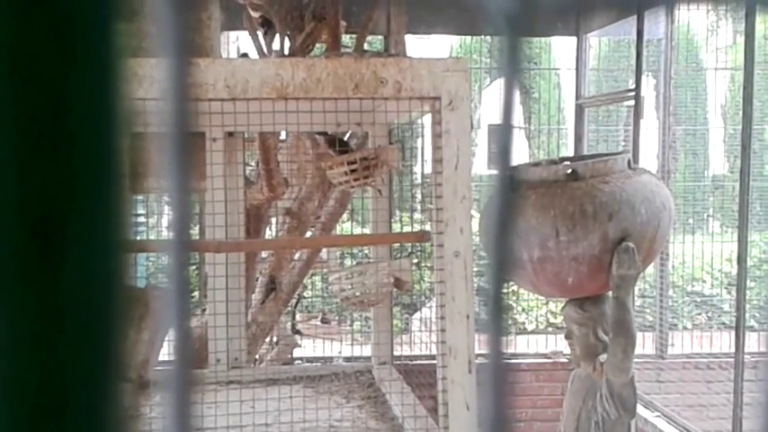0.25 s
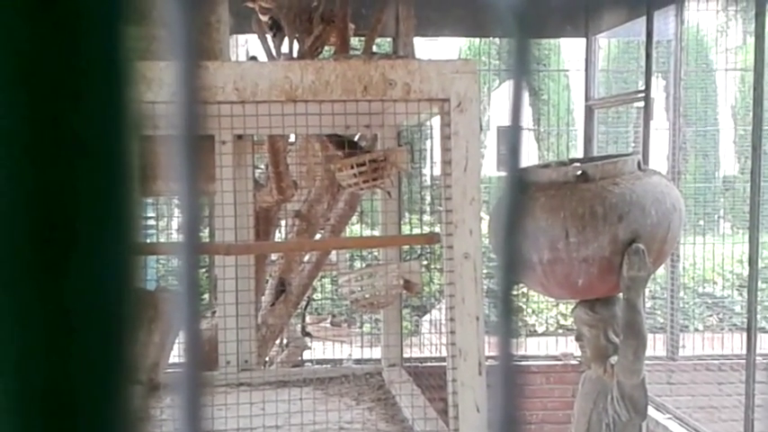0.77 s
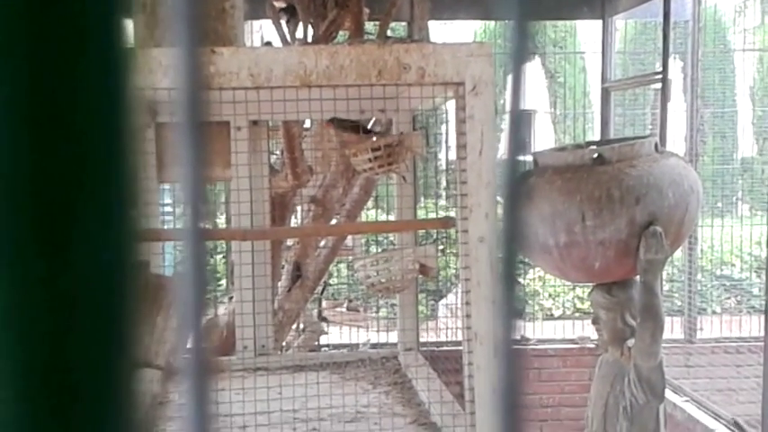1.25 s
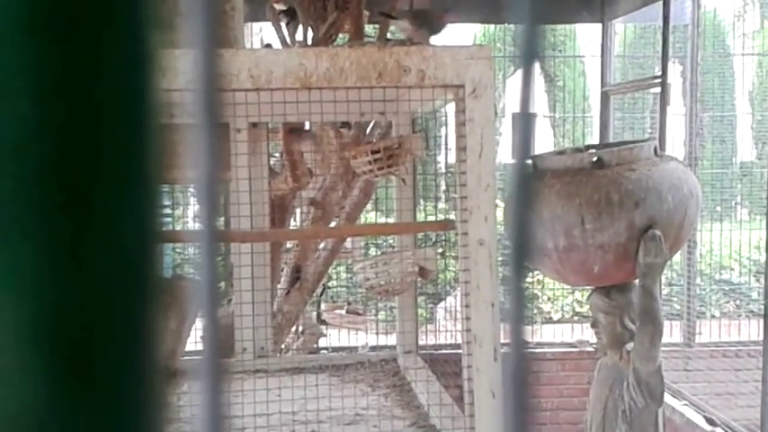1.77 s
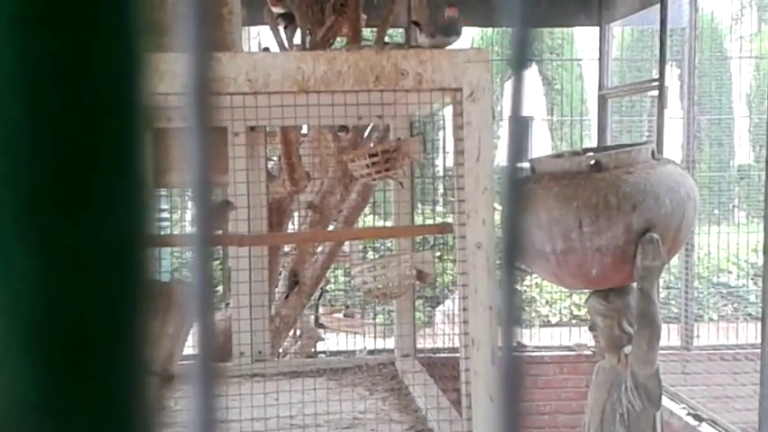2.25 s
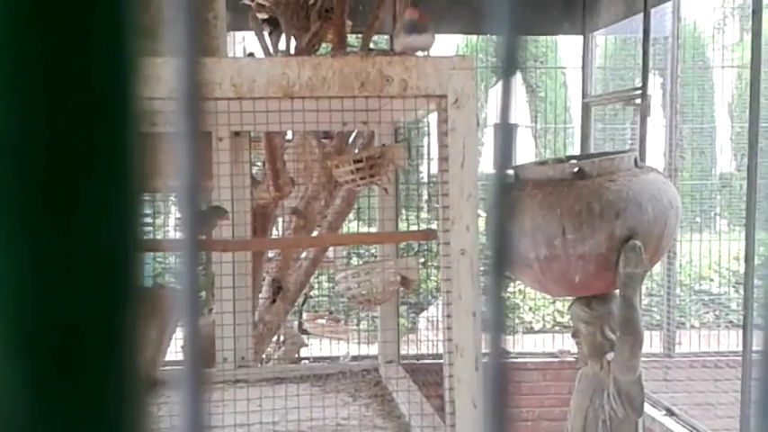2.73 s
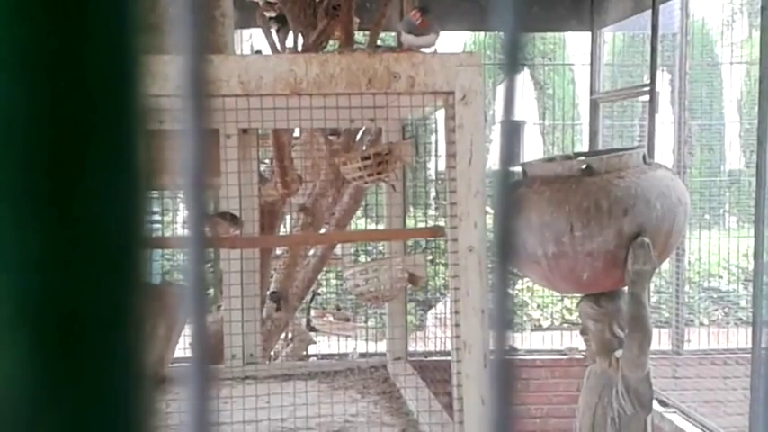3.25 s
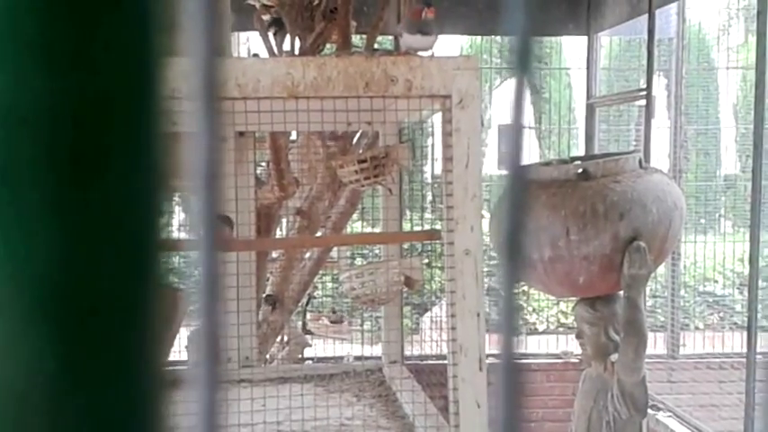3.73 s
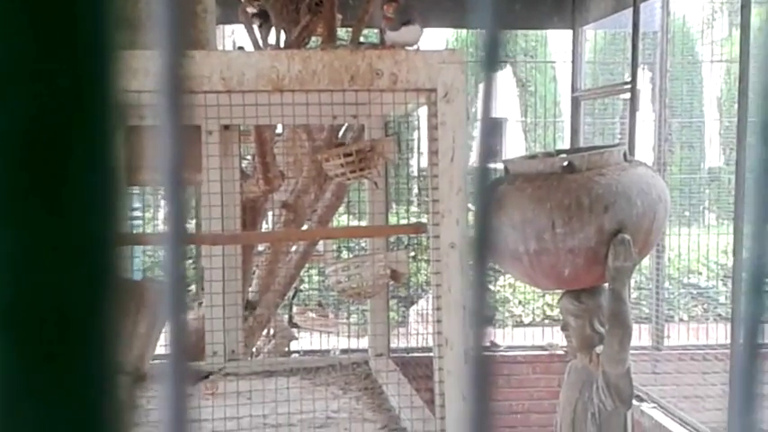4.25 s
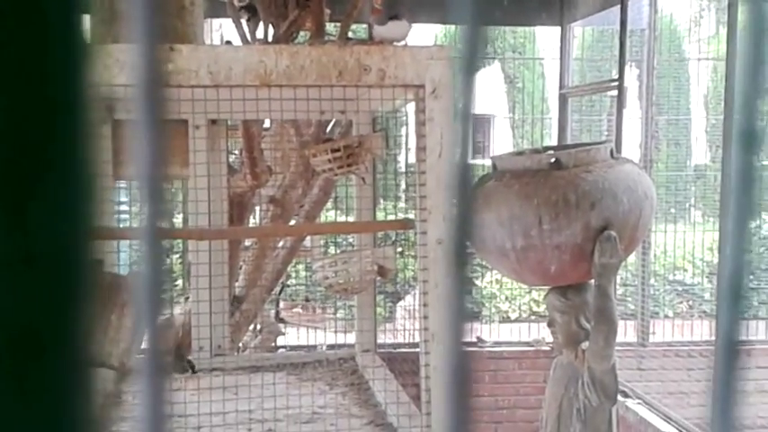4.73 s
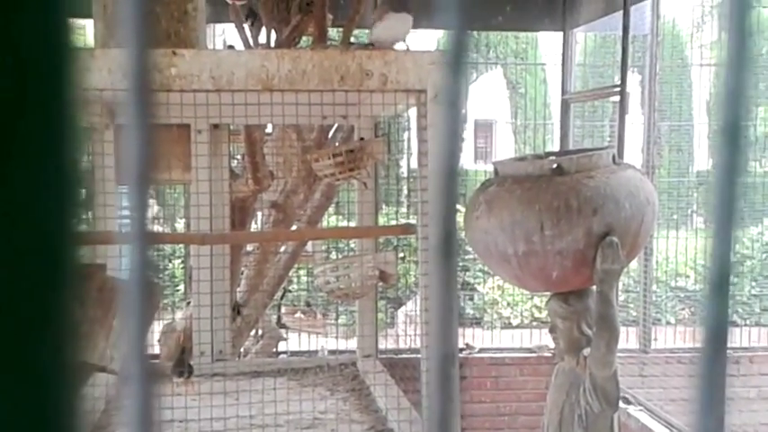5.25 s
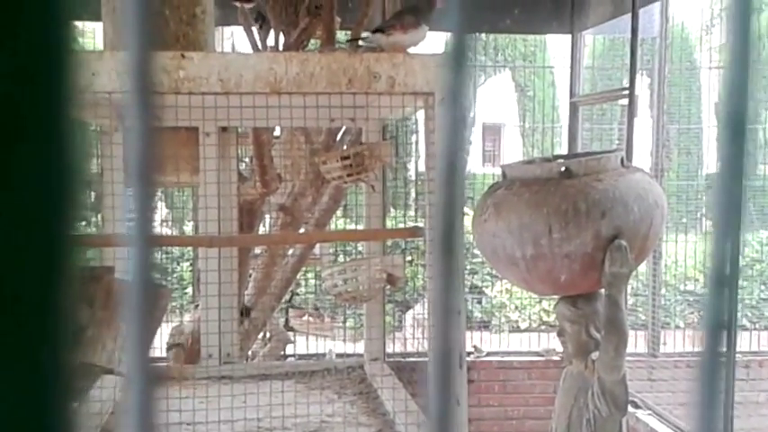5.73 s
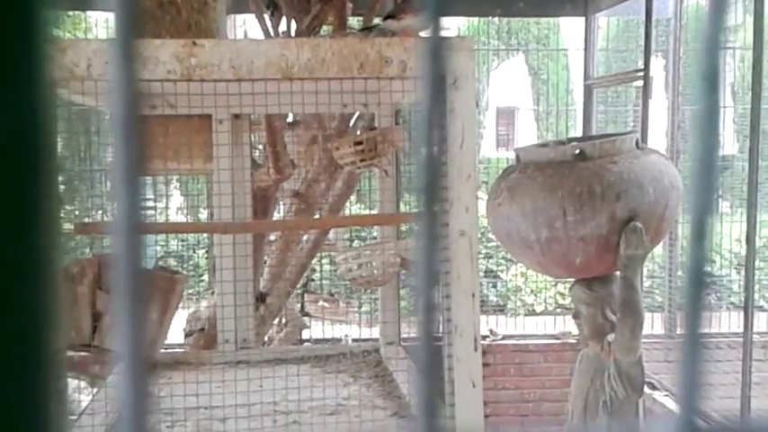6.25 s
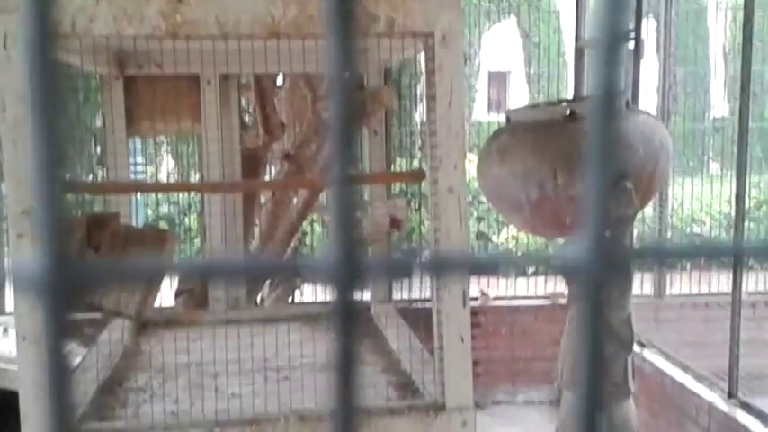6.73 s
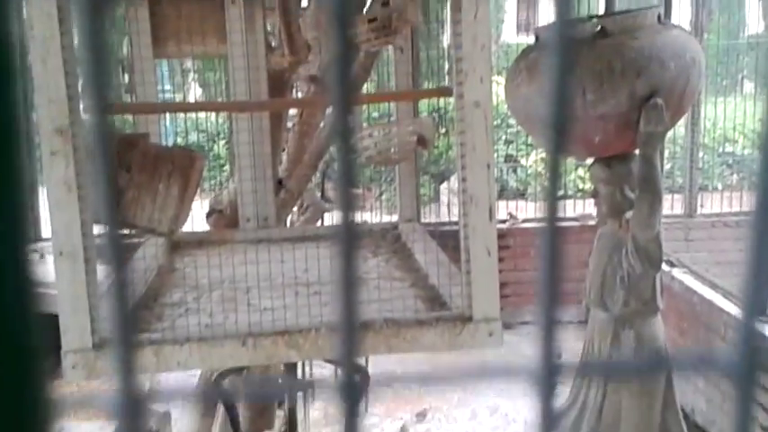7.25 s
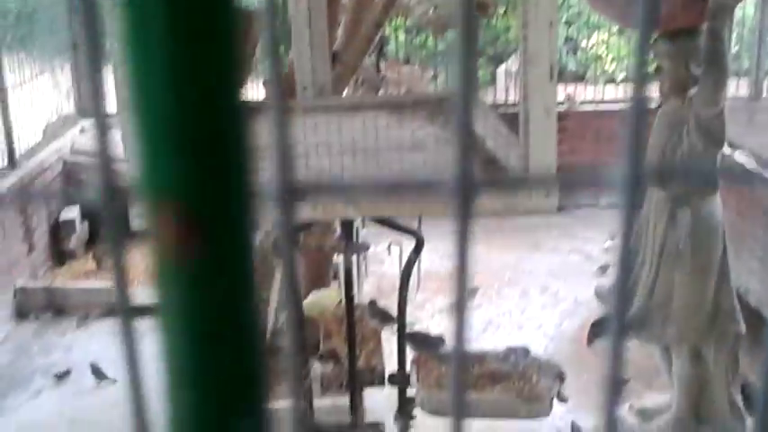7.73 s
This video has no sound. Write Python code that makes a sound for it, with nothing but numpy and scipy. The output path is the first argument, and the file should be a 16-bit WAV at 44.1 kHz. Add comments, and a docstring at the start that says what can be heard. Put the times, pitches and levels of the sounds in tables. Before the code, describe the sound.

Small finches call inside a roofed outdoor aviary. Short nasal beeps and thin peeps come first, then a loud burst of piercing high whistles around one second. Quieter peeps and soft low notes follow, then bright upward chips recur more regularly later on. A farther flock twitters constantly with short hard echoes. A handheld phone microphone also catches soft garden air, a faint low engine drone and two tiny wire ticks.

```python
"""Small finches near a phone whistle, peep, chip and rasp (gliding, hoarse near-sines) or give nasal calls
(overtone stacks under a beak resonance) in a roofed outdoor aviary. The far flock, many short calls at random
moments, blurs into chatter in the echoes (sparse decaying taps). Ticks on the wire are sharp impulses with fizz;
the garden's low wash is shaped noise, a far engine's drone two narrow noise bands."""
import sys
import numpy as np
from scipy import signal
from scipy.fft import rfft, irfft, next_fast_len
from scipy.io import wavfile
from scipy.ndimage import uniform_filter1d

SR = 44100
rng = np.random.default_rng(int(sys.argv[2]) if len(sys.argv) > 2 else 0)


def generate_wav(signal):
    """Clip the signal to [-1, 1] and save it as 16-bit WAV at the path in sys.argv[1]."""
    frames = np.transpose(np.atleast_2d(signal))
    scaled = np.clip(frames, -1, 1) * 32767
    pcm = np.round(scaled).astype(np.int16)
    wavfile.write(sys.argv[1], SR, pcm)


N = 352403


def gain_of(db):
    """Decibels to amplitude."""
    return 10 ** (np.asarray(db) / 20)


def evened(x):
    """Scaled to rms 1."""
    return x / np.sqrt(np.mean(abs(x) ** 2) + 1e-20)


def read(points, hz):
    """Curve interpolated on a log-frequency axis."""
    point_hz, value = np.transpose(points)
    return np.interp(np.log(hz + 1), np.log(point_hz + 1), value)


def add(mix, start_s, sound):
    """Mixes a sound in at start_s, cut at the end of the mix."""
    part = mix[round(start_s * SR):][:len(sound)]
    part += sound[:len(part)]


def garden():
    """Garden air and distant traffic: random short-time spectra with faint drifting patches, steadier bass."""
    # Wash spectrum. Each row: frequency in Hz, relative density in dB.
    wash_spectrum = [(15, -46), (30, -28), (45, -27), (65, 6), (90, -5), (140, -10), (230, -12),
                     (350, -9.5), (560, -14.5), (1100, -12), (2600, -8.5), (5000, -4), (8000, -11),
                     (10000, -11), (14900, -8.5)]
    level_db, patch_db = -32.5, 2.25
    frames, hz = N // 256 + 5, np.fft.rfftfreq(1024, 1 / SR)
    a, b, patches = rng.standard_normal((frames, 513, 3)).T
    patches = uniform_filter1d(patches, 8, 0)  # over frequency
    patches = evened(uniform_filter1d(patches, 20, 1))  # over time
    depth_db = patch_db * np.minimum(hz / 600, 1)
    spectra_db = read(wash_spectrum, hz)[:, None] + depth_db[:, None] * patches
    spectra = (a + 1j * b) * gain_of(spectra_db)
    wash = signal.istft(spectra, nperseg=1024, noverlap=768)[1][:N]
    return gain_of(level_db) * evened(wash)


def drone():
    """Far engine on two low notes: two narrow bands of noise, each swelling on its own."""
    # Swells. Each row: time in seconds, upper note level in dB, lower note level in dB.
    swells = [(0, -70, -65), (1.1, -55.5, -69), (2.1, -63.5, -70), (3, -63, -68), (3.52, -62, -53.5),
              (4.05, -63, -64), (5.55, -51.5, -61), (5.92, -71, -53), (6.25, -57, -48.5), (6.68, -57, -65),
              (7.41, -64, -54), (7.99, -60, -59)]
    # Band centres: upper note in Hz, lower note in Hz.
    centres_hz = (147, 104.6)
    half_width_hz = 7.5  # to half amplitude
    point_s, *levels_db = np.transpose(swells)
    out, hz = np.zeros(N), np.fft.rfftfreq(N, 1 / SR)
    for centre_hz, level_db in zip(centres_hz, levels_db):
        a, b = rng.standard_normal((2, len(hz)))
        band = irfft((a + 1j * b) / (1 + ((hz - centre_hz) / half_width_hz) ** 2), N)
        out += evened(band) * gain_of(np.interp(np.arange(N) / SR, point_s, level_db))
    return out


def aviary(x):
    """Echoes off roof, wall and floor: sparse taps of random sign, each band dying at its own speed."""
    # Decay. Each row: frequency in Hz, time to fall 60 dB in seconds.
    decay = [(1500, 0.38), (4000, 0.25), (7000, 0.28)]
    taps = np.zeros(SR // 2)
    at = np.arange(160, len(taps) - 20, 20)
    taps[at + rng.integers(0, 20, len(at))] = rng.choice([-1., 1.], len(at))
    hz, t, spectra = signal.stft(taps, SR, nperseg=256)
    fading = spectra * gain_of(-60 * t / read(decay, hz)[:, None])
    tail = signal.istft(fading, SR, nperseg=256)[1]
    return signal.fftconvolve(x, tail / np.linalg.norm(tail))[:N]


def breath(length_s, rise_s):
    """Time as a share of the call, and its envelope: quick onset, sagging body, rounded end."""
    t = np.arange(1, (length_s + .004) * SR) / SR
    u = t / t[-1]
    rise = np.minimum(t / rise_s, 1)
    return u, evened(rise * np.exp(-.3 * u) * np.cos(np.pi * u / 2) ** 0.11)


def note(length_s, start_hz, end_hz, level_db, hoarse_hz, octave_db=-42.0):
    """A gliding near-sine with a breathy octave; an unsteady syrinx smears the line into a band."""
    u, shape = breath(length_s, rise_s=.004 + .1 * length_s)
    turns = np.cumsum(start_hz + (end_hz - start_hz) * u ** 1.403) / SR  # the glide speeds up
    a, b, c = rng.standard_normal((3, round(.3 * SR)))
    smooth = signal.butter(2, np.clip(hoarse_hz, 60, 2000), fs=SR, output="sos")
    flutter = evened(signal.sosfilt(smooth, a + 1j * b)[-len(u):])
    flutter_share = np.clip(0.12 + hoarse_hz / 400, 0, 1)  # of the power
    unsteady = np.sqrt(1 - flutter_share) + np.sqrt(flutter_share) * flutter
    tone = unsteady * np.exp(2j * np.pi * turns)
    octave_breath = evened(uniform_filter1d(c, 60))[:len(u)]
    octave = octave_breath * shape * np.exp(4j * np.pi * turns)
    return gain_of(level_db) * shape * np.sqrt(2) * (tone + gain_of(octave_db) * octave).real


def nasal(length_s, start_hz, end_hz, level_db, beak_hz, open_share=0.073):
    """Overtones of a slightly arched, slightly shaky pitch, strongest at the beak resonance."""
    u, shape = breath(length_s, rise_s=0.0083)
    shake = evened(uniform_filter1d(rng.standard_normal(round(.4 * SR)), 300))[:len(u)]
    hz = (start_hz + (end_hz - start_hz) * u) * (1 + .016 * np.sin(np.pi * u) + .004 * shake)
    k = np.arange(1, int(7500 / max(start_hz, end_hz)) + 1)[:, None]
    leak = np.clip(open_share, 0, 1) * (k * hz > 1150)  # overtones off the resonance
    resonance = 1 / (1 + ((k * hz - beak_hz) / 950) ** 2) ** 2
    overtones = (leak + resonance) * np.sin(2 * np.pi * k * np.cumsum(hz) / SR)
    shape = shape * gain_of(2.5 * shake[::-1])  # the breath is uneven
    return gain_of(level_db) * shape * evened(overtones.sum(0))


def far_flock(voices=110, count=1600):
    """Short calls, five in six hoarse chips and the rest nasal, repeated at random moments."""
    # Call weighting. Each row: frequency in Hz, relative level in dB.
    weighting = [(1100, -15.5), (2000, -20), (3000, -17), (3800, 1.5), (5000, -6), (5900, 0.5), (6600, -10),
                 (7400, -8.5)]
    out, calls = np.zeros(N), []
    for k in range(voices):
        long, glide = rng.random(2)
        hz = 1200 + 6200 * (k + long) / voices
        db = read(weighting, hz)
        if k % 6:
            calls.append(note(.01 + .04 * long, hz, hz * (.9 + .25 * glide), db, 150 + 300 * long))
        else:
            pitch_hz = 900 + 550 * glide
            calls.append(nasal(0.0293 + 0.037 * long, pitch_hz, pitch_hz * 1.04, db - 3, beak_hz=hz))
    for when, which, loud in rng.random((count, 3)):
        add(out, when * N / SR, gain_of(8.7 * loud) * calls[int(which * len(calls))])
    return evened(out)


def chatter():
    """The far flock, mostly echo, rising and falling as it gets busier or quieter."""
    # Busyness. Each row: time in seconds, level in dB.
    busyness = [(0, -25), (.27, -36.5), (.51, -35), (.93, -30.5), (1.05, -39), (1.29, -30), (1.55, -36),
                (2.199, -39), (2.45, -29), (3.05, -37.5), (3.61, -33.5), (4.25, -30.5), (4.54, -29.5),
                (4.68, -31), (4.82, -26.5), (5.05, -35.5), (5.72, -27.5), (6.25, -35), (6.7, -28.5),
                (7.08, -35.5), (7.41, -27.5), (7.56, -33.5), (7.99, -36.5)]
    flock = far_flock()
    far = evened(gain_of(-4.0) * flock + aviary(flock))
    return far * gain_of(np.interp(np.arange(N) / SR, *np.transpose(busyness)))


def ticks():
    """Dry, bright clicks on the wire: an impulse and a short fizz, the bass differenced away."""
    # Each row: start in seconds, strength in dB.
    clicks = [(1.1832, 2.5), (4.7422, 2)]
    out, t = np.zeros(N), np.arange(200) / SR
    for start_s, db in clicks:
        fizz = 0.5 * rng.standard_normal(len(t)) * gain_of(-60 * t / 0.0065)
        add(out, start_s, gain_of(db) * np.convolve((t == 0) + fizz, [1, -1.7, .7]))
    return out


def low_notes(out):
    """Soft low notes that sag slightly in pitch; louder ones are hoarser."""
    # Each row: start in seconds, length in seconds, start pitch in Hz, level in dB.
    rows = [(.405, .1, 1650, -43), (.819, 0.11, 2776, -45), (1.576, 0.018, 2340, -37),
            (1.876, 0.074, 2110, -41.5), (1.97, 0.096, 2152, -40.5), (2.108, .05, 2340, -41),
            (2.223, .055, 1980, -38), (2.28, 0.046, 2310, -33), (2.46, 0.043, 2150, -37),
            (2.553, 0.056, 2180, -35.5), (2.642, 0.078, 2373, -36), (2.721, .11, 2220, -39.5),
            (3.55, 0.025, 1707, -44.5), (4.06, .039, 2900, -45), (4.65, .1, 2710, -39.5),
            (4.755, 0.055, 2800, -39), (5.683, 0.021, 1634, -42.5), (6.283, .27, 2427, -46.5),
            (7.07, 0.074, 1312, -46), (7.239, .027, 2256, -38), (7.424, 0.012, 3180, -36.2),
            (7.489, 0.038, 1323, -44), (7.639, 0.05, 1338, -44.5)]
    sag_share, soft_db, soft_hoarse_hz, hoarse_hz_per_db = .01, -47, 60, 18
    for start_s, length_s, hz, db in rows:
        hoarse_hz = soft_hoarse_hz + hoarse_hz_per_db * (db - soft_db)
        add(out, start_s, note(length_s, hz, hz * (1 - sag_share), db, hoarse_hz))


def nasal_calls(out):
    """Stacks of overtones; higher calls leak more of them off the beak resonance."""
    # Each row: start in seconds, length in seconds, start and end pitch in Hz, level in dB,
    # beak resonance in Hz.
    rows = [(.02, .08, 1408, 1464, -34.9, 4000), (.39, .075, 1330, 1450, -35.5, 3900),
            (.61, .07, 950, 945, -29.5, 4150), (.75, .07, 1360, 1380, -35.7, 3800),
            (2.05, .12, 640, 640, -37.8, 5300), (2.21, .09, 988, 1016, -34.7, 4010),
            (2.31, .07, 968, 952, -32.3, 4450), (2.48, .08, 930, 932, -32, 4500),
            (2.71, .07, 930, 940, -31.7, 4450), (3.37, .06, 952, 1020, -30.5, 4350),
            (3.76, .08, 1332, 1372, -32, 4060), (4.715, .08, 1385, 1400, -30.5, 3700),
            (5.33, .12, 1346, 1432, -35.5, 4170), (5.74, .07, 1368, 1480, -29.6, 5200),
            (6.05, .07, 1248, 1264, -34.3, 3770), (6.585, .065, 1344, 1442, -31.3, 3900),
            (7.68, .06, 924, 924, -34.4, 3700), (7.83, .06, 1160, 1160, -38.8, 3480)]
    open_at_1khz, open_power = 0.036, 3.9
    for start_s, length_s, start_hz, end_hz, db, beak_hz in rows:
        open_share = open_at_1khz * (start_hz * .001) ** open_power
        add(out, start_s, nasal(length_s, start_hz, end_hz, db, beak_hz, open_share))


def rasps_and_hoarse_chips(out):
    """Broad rasps and two short hoarse upward chips, smeared by a fast flutter."""
    # Each row: start in seconds, length in seconds, start and end pitch in Hz, level in dB.
    rows = [(.85, .11, 5900, 5700, -25), (.201, 0.064, 6000, 6400, -25.5), (.17, .1, 3400, 3390, -34),
            (2.371, .07, 5400, 5200, -29.5), (2.502, 0.095, 5500, 5800, -28.5),
            (3.526, 0.071, 5600, 5600, -26.5), (1.206, .084, 3230, 3200, -32),
            (4.031, .11, 4600, 4100, -31.5), (4.194, 0.092, 4500, 4100, -29),
            (4.509, 0.07, 5300, 4900, -28), (6.65, .13, 4340, 3860, -29.5), (4.166, .02, 5620, 6700, -21),
            (5.172, .018, 5570, 7200, -22.5), (7.227, 0.092, 6600, 8000, -27.5),
            (7.752, 0.081, 5200, 4600, -31)]
    for start_s, *row in rows:
        add(out, start_s, note(*row, hoarse_hz=520, octave_db=-26))


def peeps(out):
    """Plain peeps: short glides with moderate flutter and a faint octave."""
    # Each row: start in seconds, length in seconds, start and end pitch in Hz, level in dB.
    rows = [(0.008, 0.032, 4170, 4290, -32.5), (0.088, 0.013, 5800, 5850, -23),
            (0.678, 0.017, 5700, 5540, -30), (0.885, 0.07, 4080, 3960, -36),
            (1.354, 0.039, 4630, 4340, -30), (1.611, .049, 4090, 4220, -36),
            (1.657, 0.047, 3670, 3360, -34.5), (1.827, .075, 3610, 3650, -39.5),
            (2.151, .098, 2880, 2855, -34), (1.934, 0.011, 6030, 5400, -27),
            (2.548, .11, 3440, 3760, -31.5), (2.852, 0.051, 5340, 5560, -32.5),
            (2.963, 0.026, 3700, 3640, -34), (3.062, 0.05, 4900, 5410, -26),
            (3.088, 0.0068, 5970, 5350, -24.5), (3.279, 0.0097, 4850, 3700, -28),
            (3.291, 0.034, 4570, 4400, -33), (3.427, 0.02, 5670, 5940, -14),
            (3.474, 0.026, 5920, 5980, -22), (3.535, 0.015, 6850, 6840, -33),
            (4.19, 0.041, 6336, 6180, -20.5), (4.418, 0.026, 4380, 3460, -28.5),
            (4.519, 0.11, 3685, 3540, -32.5), (4.63, .018, 5920, 5490, -26),
            (4.778, 0.055, 3520, 4380, -33), (4.964, 0.011, 5650, 5940, -26),
            (5.029, 0.046, 5130, 5200, -26), (5.352, 0.014, 5600, 5500, -29),
            (5.45, 0.024, 4140, 4680, -28.5), (5.697, .035, 4730, 5350, -23),
            (5.836, 0.015, 4640, 5000, -18), (5.848, 0.0081, 5110, 4140, -24),
            (6.135, 0.057, 5160, 5430, -27), (6.223, .016, 4260, 4320, -29), (6.391, .017, 4810, 4650, -30),
            (6.443, 0.016, 5600, 5630, -31), (6.595, 0.058, 5270, 5770, -29),
            (6.628, 0.015, 4560, 4910, -19), (6.838, .045, 4750, 4520, -30),
            (7.011, 0.023, 4210, 5030, -26), (7.104, 0.0088, 5620, 5870, -23),
            (7.417, .022, 4650, 4640, -32), (7.428, .012, 4860, 4390, -18),
            (7.514, .015, 5400, 5710, -28.5), (7.708, 0.029, 4670, 4660, -22)]
    for start_s, *row in rows:
        add(out, start_s, note(*row, hoarse_hz=162, octave_db=-32))


def chips(out):
    """Fast upward chips, all set to one sweep rate, so wider ones last longer."""
    # Each row: start in seconds, start and end pitch in Hz, level in dB.
    rows = [(0.543, 5150, 7000, -24), (.808, 4650, 6400, -25), (2.24, 4950, 6360, -26),
            (3.746, 5350, 6520, -16), (4.125, 4850, 6170, -24), (4.185, 5550, 6240, -19),
            (4.836, 4940, 6420, -15.5), (5.64, 5000, 6340, -16), (6.056, 5000, 6170, -17),
            (6.501, 5000, 6490, -17.5), (6.909, 4950, 6160, -18), (7.366, 5050, 6180, -17.5)]
    sweep_hz_per_s = 72000
    for start_s, start_hz, end_hz, db in rows:
        length_s = (end_hz - start_hz) / sweep_hz_per_s
        add(out, start_s, note(length_s, start_hz, end_hz, db, hoarse_hz=70, octave_db=-28))


def whistles_and_glides(out):
    """Whistles, glides and a chip, loud to faint, each with its own hoarseness and octave."""
    # Each row: start in seconds, length in seconds, start and end pitch in Hz, level in dB,
    # hoarseness in Hz (sets flutter cutoff and share), octave in dB relative to the tone.
    rows = [(.081, 0.051, 5030, 5020, -26, 120, -18), (0.138, 0.059, 6130, 5960, -20, 200, -16),
            (0.196, 0.067, 4200, 4600, -27, 380, -13), (0.817, 0.041, 4360, 5420, -26.5, 248, -10.5),
            (0.825, 0.12, 6522, 6540, -11.5, 132, -19), (0.976, 0.028, 6600, 6610, -24, 40, -26),
            (1.046, .067, 5174, 5730, -18.5, 250, -16), (1.076, 0.039, 6310, 6080, -10, 250, -18),
            (1.085, .089, 5770, 6175, -8.5, 219, -20), (1.209, 0.042, 6280, 6070, -17, 603, -7.5),
            (1.246, 0.044, 6810, 6750, -18.5, 200, -2), (1.247, 0.034, 5230, 5690, -16, 308, -26),
            (1.343, 0.095, 5290, 5610, -19, 307, -16), (1.375, .026, 6700, 6705, -21, 82, -6),
            (2.577, .06, 4140, 3930, -35, 70, -5), (2.586, 0.082, 5100, 5160, -33, 140, -11),
            (3.427, 0.052, 4900, 4770, -27.5, 500, -10), (4.432, 0.021, 5600, 7280, -22.5, 60, -9),
            (4.458, 0.026, 5090, 5150, -24.5, 350, -11), (4.465, 0.082, 6370, 6070, -15.5, 220, -13),
            (5.185, 0.086, 5100, 5120, -18, 170, -9.5), (5.949, .052, 4760, 4800, -30, 251, -16),
            (5.956, 0.037, 4250, 3870, -31.5, 220, -18), (7.228, .096, 5600, 5480, -25, 520, -7),
            (7.24, .023, 4314, 4440, -20.5, 140, -16), (7.28, .036, 3470, 3750, -30, 70, -30),
            (7.315, .054, 3800, 4760, -23, 70, -30), (7.366, .043, 4310, 4580, -23.5, 200, -11.5),
            (7.893, 0.073, 5740, 5900, -34, 190, -20)]
    for start_s, *row in rows:
        add(out, start_s, note(*row))


def near_birds():
    """Every near call, voiced by the manner of its kind."""
    out = np.zeros(N)
    for kind in (low_notes, nasal_calls, rasps_and_hoarse_chips, peeps, chips, whistles_and_glides):
        kind(out)
    return out


def scene():
    """Wash, drone, chatter and dry ticks under the near birds, which are part dry and part echo."""
    background = garden() + drone() + chatter() + ticks()
    calls = near_birds()
    near = gain_of(-2.5) * calls + gain_of(-4.0) * aviary(calls)
    return (background + near)[None]


def record(dry):
    """Microphone colour, gain control that ducks everything under loud calls, band limit."""
    # Microphone response. Each row: frequency in Hz, gain in dB.
    response = [(6300, 0), (6800, -4.5), (7200, -6.5), (7700, -11), (8100, -15.5), (9000, -13.5),
                (15000, -25.5)]
    threshold_db, fall_db_per_s, duck_db_per_db, edge_hz = -14.5, 13.7, 0.89, 15000
    size = next_fast_len(N)
    colour = gain_of(read(response, np.fft.rfftfreq(size, 1 / SR)))
    heard = irfft(rfft(dry, size) * colour, size)[:, :N]
    power_db = 10 * np.log10(abs(uniform_filter1d(heard[0] ** 2, 1300)) + 1e-12)
    fall_db = np.arange(N) * fall_db_per_s / SR
    held_db = np.maximum.accumulate(power_db + fall_db) - fall_db  # jumps to peaks, then falls steadily
    over_db = np.maximum(held_db - threshold_db, 0)
    ducked = heard / gain_of(duck_db_per_db * uniform_filter1d(over_db, 600))
    low_pass = signal.firwin(2047, edge_hz, window=("kaiser", 10), fs=SR)
    return signal.oaconvolve(ducked, low_pass[None], "same")


dry = scene()
out = record(dry)
generate_wav(out)
```